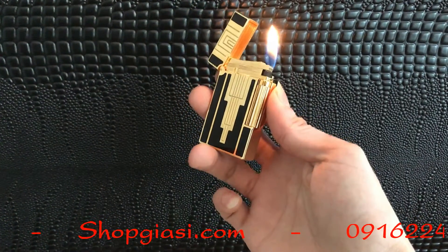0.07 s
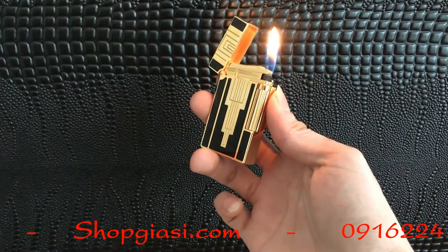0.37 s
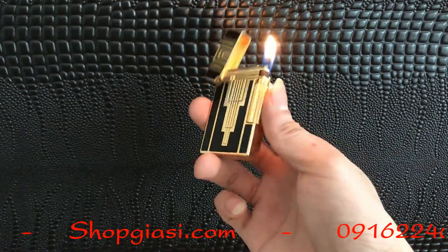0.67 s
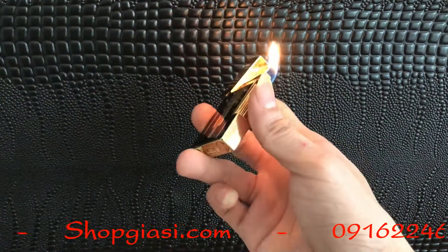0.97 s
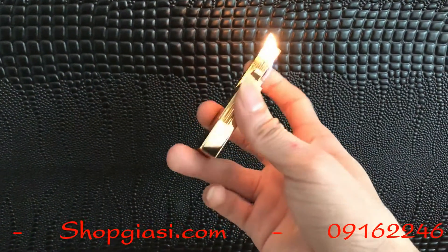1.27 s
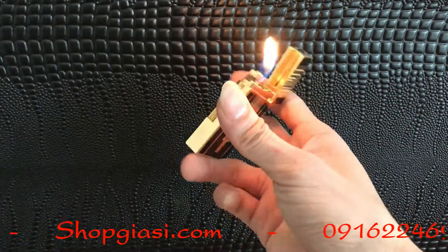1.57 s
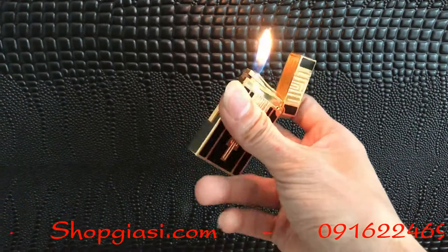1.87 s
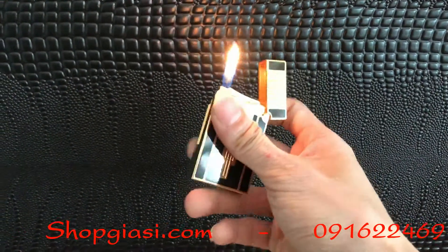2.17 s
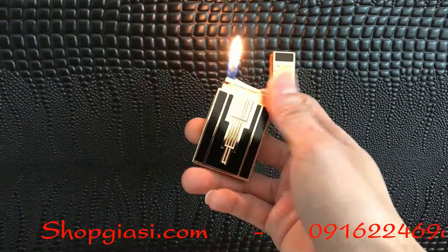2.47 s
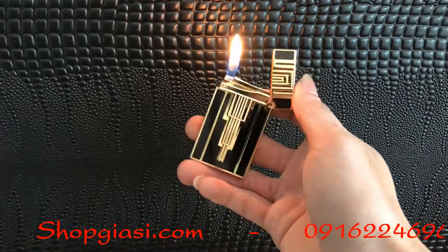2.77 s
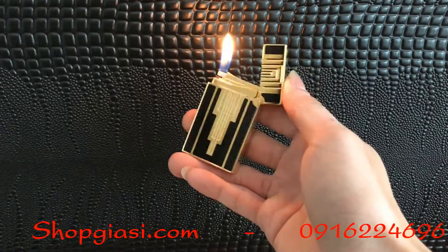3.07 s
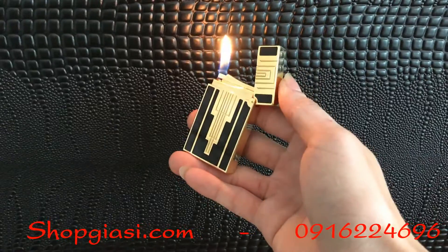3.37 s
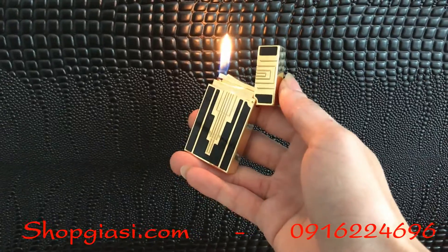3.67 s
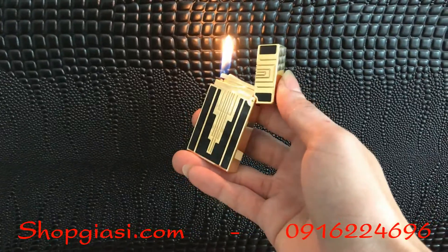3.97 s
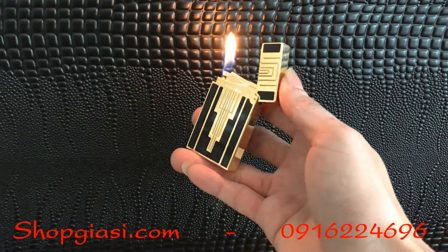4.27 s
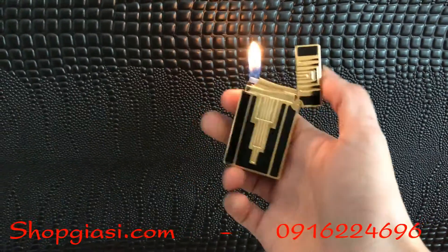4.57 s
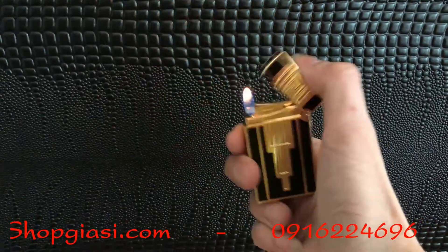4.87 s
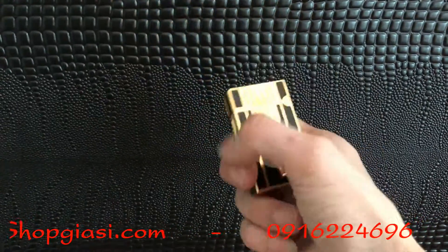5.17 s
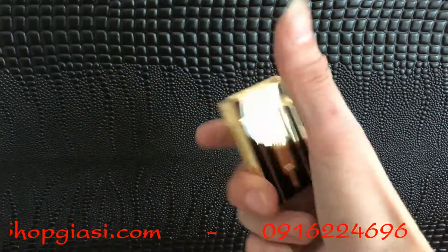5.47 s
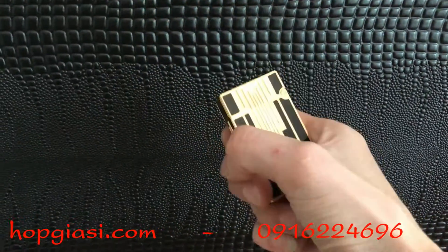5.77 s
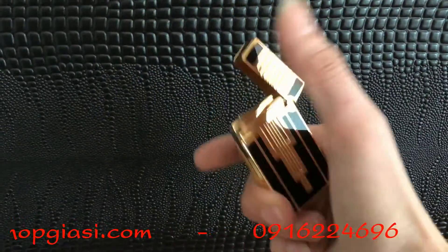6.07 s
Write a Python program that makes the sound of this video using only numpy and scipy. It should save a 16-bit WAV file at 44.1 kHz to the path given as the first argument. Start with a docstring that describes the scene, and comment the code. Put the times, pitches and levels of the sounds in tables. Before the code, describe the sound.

A metal lighter is handled quietly, then its lid snaps shut, clacks again and flicks open with a clear ping.

```python
"""A heavy metal flip-top lighter is handled close to the microphone. Its lid snaps shut, clacks once
more under the thumb, and is then flicked open, ringing with one clear ping. Before that, a hiss dies
away and fingers stroke the case, the skin rubbing on the metal. Each knock of the lid makes the metal
ring and echoes off the hard walls of the room, where a low rumble goes on throughout."""
import sys
import numpy as np
from scipy import signal
from scipy.fft import rfft, irfft, next_fast_len
from scipy.io import wavfile
from scipy.ndimage import map_coordinates

SR = 44100
rng = np.random.default_rng(int(sys.argv[2]) if len(sys.argv) > 2 else 0)


def output_pcm(signal):
    """Save a mono or channel-first signal as 16-bit PCM at the path in sys.argv[1].

    Samples are clipped to [-1, 1] before scaling.
    """
    pcm = np.clip(np.atleast_2d(signal).T, -1, 1) * 32767
    wavfile.write(sys.argv[1], SR, np.round(pcm).astype(np.int16))


N = 278712
HIGH_RING_HZ = 7000  # divides the metal's low ring from its high ring
TOP_HZ = 15900  # upper limit of the sound


def amp(db):
    """Turn decibels into a number to multiply a sound by."""
    return 10 ** (np.asarray(db) / 20)


def along(points, hz):
    """Read between (Hz, value) points, with every octave given equal room."""
    point_hz, values = np.transpose(points)
    return np.interp(np.log(hz + 1), np.log(point_hz + 1), values)


def peak(hz, centre, width):
    """How strongly one resonance responds: most at its centre, far less to either side."""
    return 1 / (1 + (2.16 * (hz - centre) / width) ** 2)


def filtered(x, response):
    """Scale each frequency in x by the gain that response gives for it."""
    size = next_fast_len(len(x) + SR // 2)
    return irfft(rfft(x, size) * response(np.fft.rfftfreq(size, 1 / SR)), size)[:len(x)]


def band_noise(gain, size=N):
    """Noise shaped by a gain for each frequency, then scaled to an average power of 1."""
    shaped = filtered(rng.standard_normal(size), lambda hz: gain(hz) * (hz < TOP_HZ))
    return shaped / np.sqrt(np.mean(shaped ** 2) + 1e-20)


def noise(colour, size=N):
    """Noise shaped by a colour table. Each row: frequency in Hz, relative level in dB."""
    return band_noise(lambda hz: amp(along(colour, hz)), size=size)


def wobble(rate):
    """A smooth curve through random values, rate of them a second."""
    knots = rng.standard_normal(int(N * rate / SR) + 4)
    return map_coordinates(knots, [np.arange(N) * rate / SR])


def ripple(hz, step_hz, depth_db):
    """Overlapping reflections make some frequencies louder and others softer."""
    knots = rng.standard_normal(int(SR / 2 / step_hz) + 4)
    return amp(depth_db * map_coordinates(knots, [hz / step_hz]))


def swell(s, db, half_length):
    """A smooth rise and fall around second s."""
    return amp(db) * np.exp(-((np.arange(N) / SR - s) / half_length) ** 2)


def add(track, s, x):
    """Mix x into the track from second s on."""
    start = round(s * SR)
    track[start:start + len(x)] += x[:N - start]


def fading_hiss():
    """A slightly grainy hiss dies away steadily; its bright fizz comes later and goes first."""
    # Colours of the hiss's two parts. Each row: frequency in Hz, relative level in dB.
    body_colour = [(290, -56), (500, -19), (563, -16), (618, 1.5), (665, -7), (844, -13), (1310, -10.5),
                   (1650, -7.5), (1810, -4), (2570, -6), (2870, 2), (3100, -7), (4500, -11.5), (5850, -40),
                   (9900, -120)]
    fizz_colour = [(2650, -33), (4500, -9), (4870, -8), (5650, 2), (5930, -6), (6120, -5.5), (7770, -8),
                   (8780, -6), (10800, -11), (15200, -13), (16000, -12)]
    body_fall_db_per_s, fizz_fall_db_per_s = 61, 82
    body_rise_s, fizz_rise_s = 0.0096, 0.023
    t = np.arange(N) / SR
    body = amp(-47 - body_fall_db_per_s * t + 0.76 * wobble(85)) * noise(body_colour)
    fizz = amp(-47.8 - fizz_fall_db_per_s * t + 0.92 * wobble(115)) * noise(fizz_colour)
    return (1 - np.exp(-t / body_rise_s)) * body + (1 - np.exp(-t / fizz_rise_s)) * fizz


def room_rumble():
    """A low rumble with a wavering hum slowly gets softer, under a faint, steady, airy noise."""
    # Colours of the rumble and the air. Each row: frequency in Hz, relative level in dB.
    rumble_colour = [(15, -57), (25, -38.5), (35, -18), (47, -11), (62, -6.5), (80, -1.5), (105, -0.5),
                     (125, -3.5), (150, -11), (190, -19.5), (240, -21.5), (300, -18.5), (400, -32.5),
                     (550, -56.5)]
    air_colour = [(200, -6.5), (450, 1), (800, 1.5), (1500, -1.5), (2200, -6), (3100, -9), (4000, -11),
                  (4900, -16), (6200, -14.5), (7600, -21), (9500, -18.5), (10400, -29.5), (11300, -20.5),
                  (15700, -18.5)]
    # Brief swells and dips. Each row: middle in seconds, change in dB, half length in seconds.
    surges = [(.14, 4.5, .17), (0.642, -3, 0.091), (3.28, -4, 0.36), (4.617, 2, 0.12), (5.2, -7, 0.16),
              (6.3, -4.5, .05)]
    rumble_fall_db_per_s, hum_fall_db_per_s = 0.3, 1  # the hum's fall adds to the rumble's
    t = np.arange(N) / SR
    surge_db = sum(change * swell(s, 0, half_length) for s, change, half_length in surges)
    rumble_db = -52 - rumble_fall_db_per_s * t + 0.5 * wobble(4) + surge_db
    hum_hz = 109.9 + 3 * wobble(12)
    hum_gain = amp(-1.5 - hum_fall_db_per_s * t + 4.1 * wobble(5))
    hum = hum_gain * np.sin(2 * np.pi * np.cumsum(hum_hz) / SR)
    return amp(rumble_db) * (noise(rumble_colour) + hum) + amp(-72) * noise(air_colour)


def stroke(s, db, rise):
    """A finger's pressure builds up to second s and eases off more slowly."""
    t = np.arange(N) / SR - s
    fall_over_rise = 2.44
    return amp(db) * np.exp(-np.maximum(-t, t / fall_over_rise) / rise)


def fingers_rub():
    """Skin rubs over the case in strokes, and the peak of each stroke makes the case ring."""
    # Finger strokes. Each row: peak time in seconds, rub level in dB, rise in seconds, ring level in dB.
    strokes = [(0.46, -70, .02, -88), (0.64, -70, 0.1, -75), (1.31, -71.5, 0.15, -86),
               (1.52, -65, .13, -69.5), (2.47, -69, 0.068, -78), (2.83, -74.5, .04, -92),
               (3.47, -82, 0.14, -77), (3.66, -77, 0.11, -80), (4.89, -76, .06, -82), (5.95, -73, .1, -86)]
    # Colour of skin rubbing on metal. Each row: frequency in Hz, relative level in dB.
    skin_colour = [(260, -34), (450, -9), (550, -11.5), (655, 0), (1030, -3.5), (1550, 0), (2000, -6),
                   (2400, -9.5), (2810, -9), (4870, -22.5), (5880, -19), (9000, -44), (11700, -48),
                   (19800, -120)]
    grip_db = -81  # skin on the case between strokes
    ring_share = 0.43  # the ring's length as a share of its stroke's
    pressure = np.sqrt(amp(grip_db) ** 2 + sum(stroke(s, db, rise) ** 2 for s, db, rise, _ in strokes))
    rub = pressure * amp(1.1 * wobble(25)) * noise(skin_colour)
    rub = filtered(rub, lambda hz: ripple(hz, step_hz=45.06, depth_db=3.0))
    ring_gain = sum(stroke(s, db, ring_share * rise) for s, _, rise, db in strokes)
    ring = ring_gain * amp(1.5 * wobble(60)) * band_noise(lambda hz: peak(hz, centre=2870, width=820))
    return rub + ring


def fingers_slide():
    """Skin slips briefly on the case, sounding brighter than the strokes."""
    # Short slides. Each row: middle in seconds, level in dB, half length in seconds.
    slides = [(0.647, -75.5, 0.033), (1.515, -74, 0.034), (1.68, -78, 0.022), (4.96, -74, .006)]
    # Colour of sliding skin. Each row: frequency in Hz, relative level in dB.
    slide_colour = [(1000, -7), (3000, 7.5), (4500, 6.5), (5500, -5), (7300, 5), (10200, -2), (12600, 2),
                    (15500, 0)]
    return sum(swell(*row) for row in slides) * amp(1.4 * wobble(250)) * noise(slide_colour)


def rustle_tones():
    """Faint tones, each a narrow band of noise, come and go in the rustle of the fingers."""
    # Each row: middle in seconds, level in dB, half length in seconds, pitch in Hz.
    tones = [(0.58, -76, 0.46, 840), (0.66, -80, 0.25, 1120), (1.39, -70, 0.11, 655),
             (5.9, -69.5, 0.098, 895)]
    return sum(swell(s, db, half_length) * band_noise(lambda hz: peak(hz, pitch, width=61))
               for s, db, half_length, pitch in tones)


def strike(modes, colour, crack_db, low_db, high_db, crack_fade_s):
    """Metal hits metal: a short crack of noise, and the tones (modes) at which the metal rings."""
    t = np.arange(SR) / SR
    hz, db, ring_fade_s = np.transpose(modes)[:, :, None]
    db = db + np.where(hz < HIGH_RING_HZ, low_db, high_db) + rng.standard_normal(hz.shape)
    fade = lambda seconds: np.exp(-np.log(1000) * t / seconds)  # falls 60 dB in that time
    ring = np.sum(amp(db) * fade(ring_fade_s) * np.sin(2 * np.pi * hz * t), axis=0)
    crack = amp(crack_db) * fade(crack_fade_s) * noise(colour, size=SR)
    return (ring + crack) * (1 - np.exp(-t / 0.00033))


def lid_shuts():
    """The lid chatters onto the case in two clacks; each contact also thuds into the hand."""
    # Lid on case. Each row: start in seconds, then gains in dB for crack, low ring, high ring and thud.
    contacts = [(5.0277, -50, -60, -40, -80), (5.0503, -17.5, -28, -10.5, -38),
                (5.0520, -22, -26, -21, -44), (5.0545, -27, -29, -13.5, -30), (5.0565, -19, -27, -20, -33),
                (5.5050, -17, -32, -13.5, -62), (5.5075, -24, -21, -27, -70), (5.5104, -24, -25, -22, -70)]
    # Tones of the shut lighter, muffled by the hand.
    # Each row: pitch in Hz, relative level in dB, seconds to fade by 60 dB.
    shut_modes = [(1617, -16, 0.024), (2270, -19, 0.025), (3340, -3.5, 0.023), (3424, -4.5, 0.02),
                  (4710, -9, 0.042), (4860, -9, 0.031), (5440, -9, 0.022), (6530, -14.5, 0.0223),
                  (7430, -24.5, 0.034), (9500, -24, 0.017), (11700, -22, .02), (12100, -17, 0.026),
                  (12650, -2.5, 0.025), (12800, -11.5, 0.0353), (13050, -11, 0.025), (13900, -7, 0.032),
                  (14400, -13.5, .03), (15620, -18, .03)]
    # Colours of the metal's crack and the thud in the hand. Each row: frequency in Hz, relative dB.
    crack_colour = [(100, -27), (500, -16), (950, -20), (1600, -0.5), (3000, 0.5), (4500, 0), (6500, -1.5),
                    (8500, -2), (10300, 2), (11200, 3), (13000, 10.5), (15500, 7.5)]
    thud_colour = [(25, -2), (55, 4), (130, 6), (200, -5), (300, -22), (420, -27), (550, -13), (900, -29),
                   (2000, -51)]
    # The echo of each clack.
    # Each row: start in seconds, gains in dB for crack, low ring and high ring, fade time multiplier.
    echoes = [(5.053, -42.3, -45.5, -33.8, 1.13), (5.507, -45, -53.5, -39.3, .96)]
    # The lighter's ring in the room. Each row: centre in Hz, width in Hz, relative level in dB.
    echo_bands = [(1790, 310, -12.5), (2380, 400, -5.5), (3354, 230, 1.5), (4800, 330, -0.5),
                  (9340, 600, -13), (12570, 650, -1), (13200, 690, -7), (14100, 380, -1.5),
                  (15450, 400, -15)]
    track, t = np.zeros(N), np.arange(SR) / SR
    for s, crack_db, low_db, high_db, thud_db in contacts:
        thud = noise(thud_colour, size=SR) * np.exp(-t / 0.0059) * (1 - np.exp(-t / 0.00056))
        low_push = amp(-2.5) * np.sin(2 * np.pi * 64 * t) * np.exp(-t / 0.0093)
        metal = strike(shut_modes, crack_colour, crack_db, low_db, high_db, crack_fade_s=0.015)
        add(track, s, amp(thud_db) * (thud + low_push) + metal)
    return track + room_echo(echoes, echo_bands)


def room_echo(echoes, bands):
    """The walls scatter each knock into a wash of noise; every frequency fades at its own speed."""
    # How long the room rings. Each row: frequency in Hz, seconds to fade by 60 dB.
    fade_times = [(200, .5), (1500, 0.92), (4000, 0.92), (8000, 0.86), (12500, 0.64), (16000, .53)]
    # Colour of a crack's echo. Each row: frequency in Hz, relative level in dB.
    echo_colour = [(100, -23), (1000, -24), (1300, -5.5), (1700, 0.5), (2400, 3), (4000, 3), (5500, 4.5),
                   (7000, 1), (9200, 0), (10300, -5), (11200, 3.5), (13000, 1.5), (16000, 1.5)]

    def ring_noise(group):
        return band_noise(lambda hz: sum(amp(db) * peak(hz, centre, width)
                                         for centre, width, db in group), size=SR)

    track = np.zeros(N)
    for s, crack_db, low_db, high_db, stretch in echoes:
        low = ring_noise([band for band in bands if band[0] < HIGH_RING_HZ])
        high = ring_noise([band for band in bands if band[0] >= HIGH_RING_HZ])
        wash = amp(crack_db) * noise(echo_colour, size=SR) + amp(low_db) * low + amp(high_db) * high
        wash = filtered(wash, lambda hz: ripple(hz, step_hz=69.9, depth_db=1.4))
        hz, frame_s, spectrum = signal.stft(wash, SR, nperseg=256)  # split by frequency and time
        fade_s = stretch * along(fade_times, hz)[:, None]
        _, tail = signal.istft(spectrum * np.exp(-np.log(1000) * frame_s / fade_s), SR, nperseg=256)
        t = np.arange(len(tail)) / SR
        late_swell = amp(2.4 * np.exp(-((t - 0.23) / 0.02) ** 2))
        add(track, s, tail * late_swell * (1 - np.exp(-t / 0.0027)))
    return track


def lid_opens():
    """A thumb scrapes the case, the catch lets go, and the lid hits its stop and rings freely; a second scrape
    follows."""
    # Scrapes as the lid is flicked, the first a thumb across the case. Each row: middle in seconds, level in
    # dB, half length in seconds.
    scrapes = [(6.147, -52, 0.0082), (6.279, -42, 0.0089)]
    # Colours of the scrape and of the lid's snap. Each row: frequency in Hz, relative level in dB.
    scrape_colour = [(1500, -28), (2800, -8), (3350, 9), (3700, 0), (4100, 1), (4650, -5), (5100, -26),
                     (7300, -14), (10200, -27), (14000, -18), (16000, -24)]
    snap_colour = [(200, -12), (700, -16), (1000, -19), (1400, -4), (2800, 3), (4000, 18.5), (5200, -7),
                   (6500, -9.5), (8200, -.5), (10200, -7), (13000, 0), (15500, -8)]
    # Hits on the catch and stop. Each row: start in seconds, gains in dB for crack, low and high ring.
    contacts = [(6.1651, -36, -46, -22.5), (6.1724, -18.5, -23, -25), (6.1748, -34, -11.5, -28)]
    # Tones of the free lid. Each row: pitch in Hz, relative level in dB, seconds to fade by 60 dB.
    lid_modes = [(2340, -20, 0.024), (3396, -6.5, 0.06), (3396, -8, 0.74), (3430, -35, 0.62),
                 (3640, -36, 0.4), (3830, -13, 0.035), (4040, -16, .025), (4620, -37, 0.36),
                 (5640, -17, 0.039), (7500, -14, 0.055), (9700, -9, 0.017), (10970, -6.5, 0.024),
                 (12620, -3, 0.018), (14090, -8, .04), (14500, -8, .025), (15800, -8, .02)]
    # The echo of the flick.
    # Each row: start in seconds, gains in dB for crack, low ring and high ring, fade time multiplier.
    echoes = [(6.174, -48.8, -37, -60, 0.91)]
    # The lid's ring in the room. Each row: centre in Hz, width in Hz, relative level in dB.
    echo_bands = [(1250, 500, -20), (2350, 600, -12.5), (3410, 48, 12.5), (3600, 70, -1), (3770, 100, -4),
                  (4040, 170, -6), (4280, 120, -15), (4625, 50, -7), (5680, 170, -30), (7500, 250, 7),
                  (11000, 210, -1), (12500, 450, 0), (14090, 200, 10)]
    track = sum(swell(*row) for row in scrapes) * noise(scrape_colour)
    for s, crack_db, low_db, high_db in contacts:
        add(track, s, strike(lid_modes, snap_colour, crack_db, low_db, high_db, crack_fade_s=0.051))
    return track + room_echo(echoes, echo_bands)


def scene():
    """The lighter, the hand, the hiss and the room, mixed into one channel."""
    lighter = lid_shuts() + lid_opens()
    hand = fingers_rub() + fingers_slide() + rustle_tones()
    return (lighter + hand + fading_hiss() + room_rumble())[None]


def record(dry):
    """The recorder drops the deepest bass and the very highest treble."""
    low_cut = signal.butter(2, 35, "highpass", fs=SR, output="sos")
    high_cut = lambda hz: 1 / np.sqrt(1 + (hz / TOP_HZ) ** 160)
    return np.array([filtered(signal.sosfilt(low_cut, channel), high_cut) for channel in dry])


dry = scene()
out = record(dry)
output_pcm(out)
```